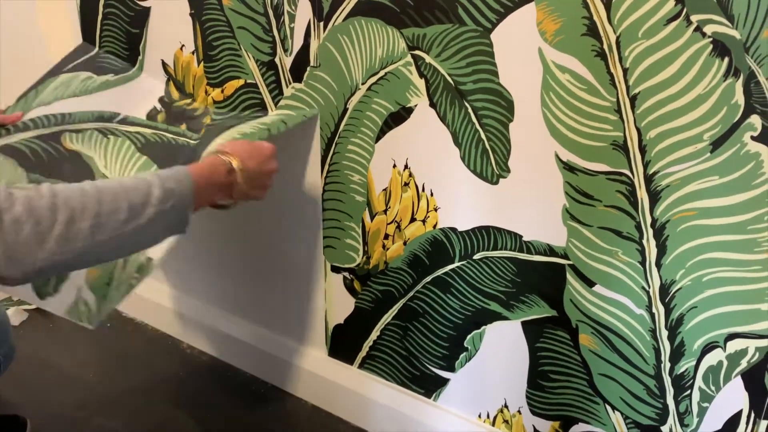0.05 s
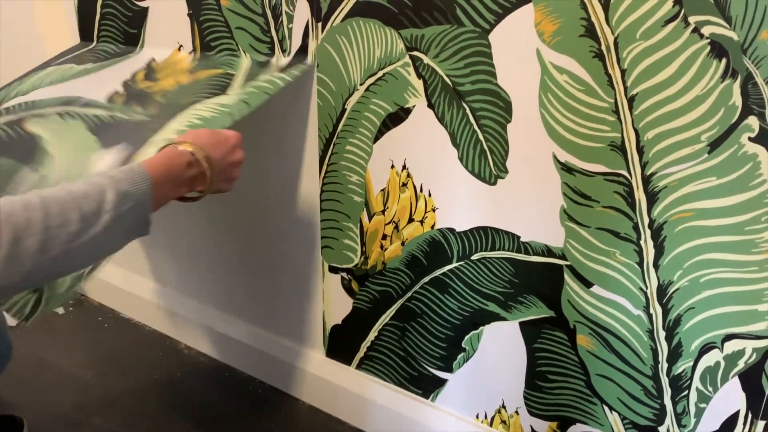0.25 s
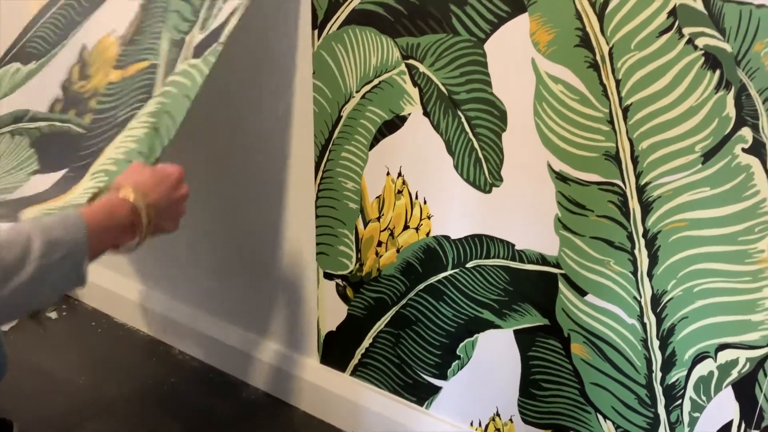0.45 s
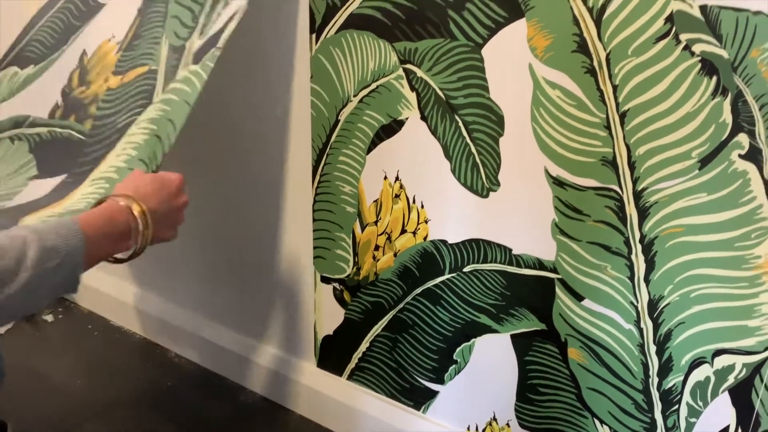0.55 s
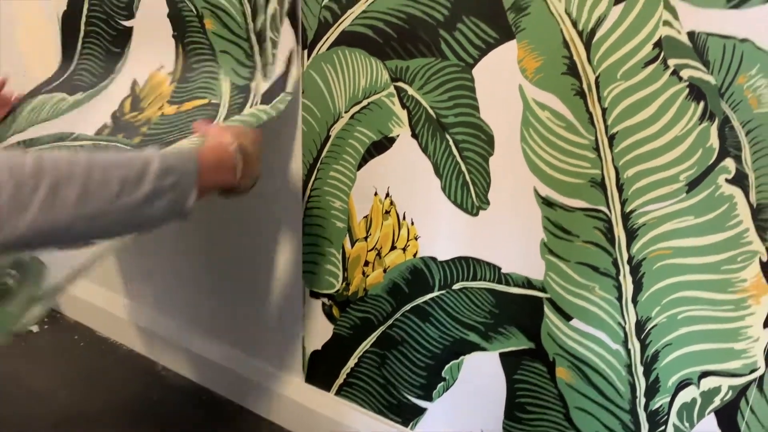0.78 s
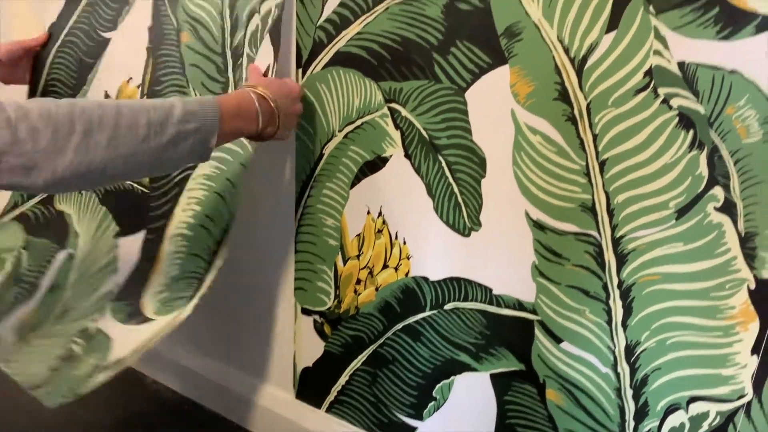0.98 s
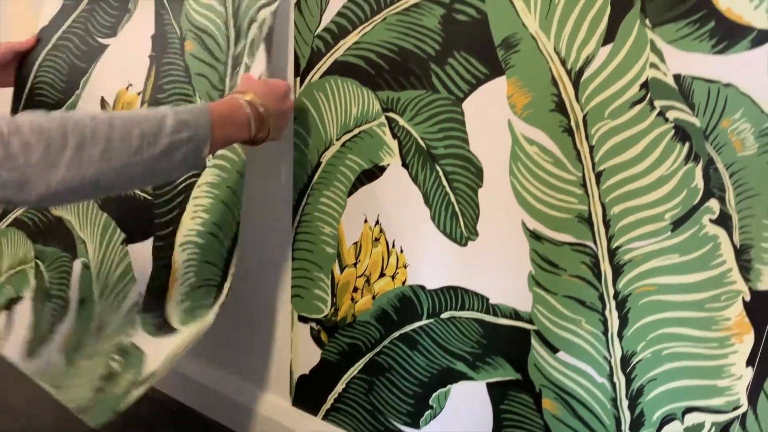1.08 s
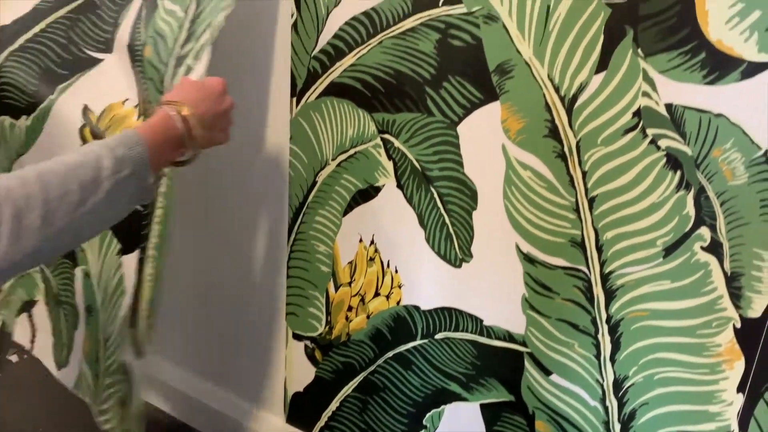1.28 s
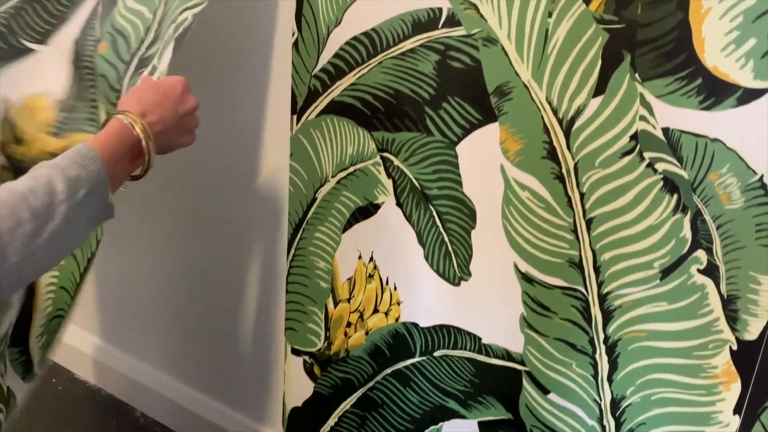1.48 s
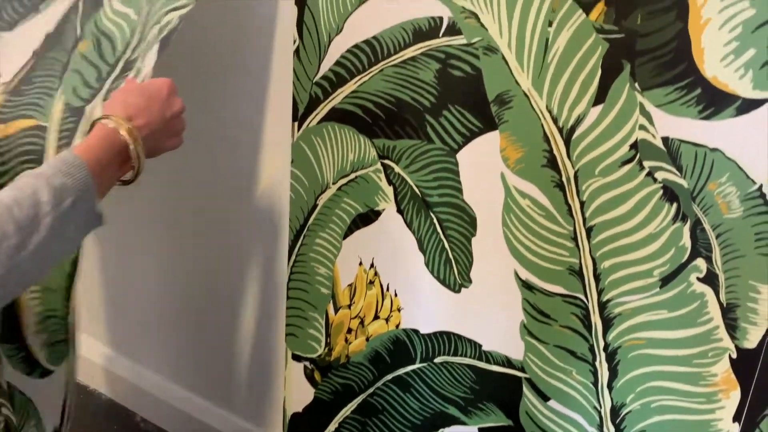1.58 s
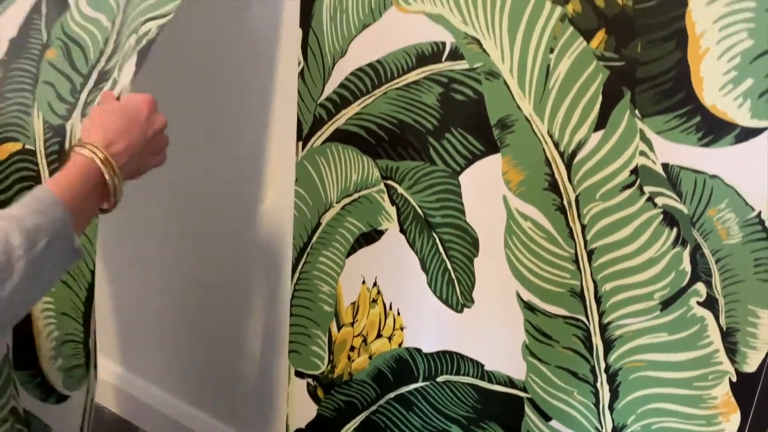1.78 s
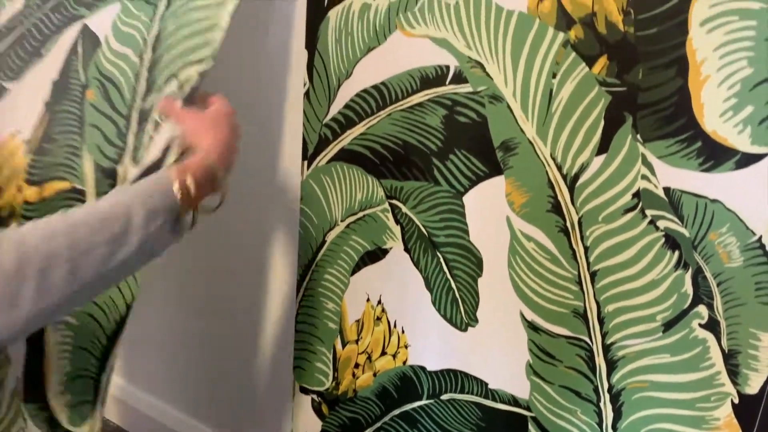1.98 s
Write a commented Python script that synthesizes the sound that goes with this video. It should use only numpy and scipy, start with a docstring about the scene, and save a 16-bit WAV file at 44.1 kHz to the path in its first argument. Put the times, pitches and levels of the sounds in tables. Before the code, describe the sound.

Wallpaper rips off a wall in two crackling pulls, with faint paper rustling between.

```python
"""A crackling rip swells as wallpaper is pulled off the wall of a bare room, heard on one microphone.
The paste lets go in thousands of tiny snaps that drum the loose sheet and ring the taut strip. Between
two strong pulls the sheet slides, flexes and crinkles as the hand takes a new grip; bangles tick faintly
on the wrist. The sheet buckles with dull pops and swings near enough to puff air at the microphone.
Near surfaces throw the treble back, and the room rings behind it."""
import sys
import numpy as np
from scipy import signal
from scipy.fft import rfft, irfft, next_fast_len
from scipy.io import wavfile
from scipy.ndimage import uniform_filter1d, map_coordinates

SR = 44100
rng = np.random.default_rng(int(sys.argv[2]) if len(sys.argv) > 2 else 0)


def master_out(mix):
    """Clip the mix to full scale and print it as 16-bit PCM to the path in sys.argv[1]."""
    frames = np.transpose(np.atleast_2d(mix))
    ceiling = np.clip(frames, -1, 1)
    pcm = np.round(ceiling * 32767).astype(np.int16)
    wavfile.write(sys.argv[1], SR, pcm)


N = 90404

# course of each pull: t/s, relative rip level/dB, relative sheet level/dB
FIRST_PULL = [(0, -47, -47.5), (.03, -47.5, -47), (.06, -42, -43.5), (.115, -44, -47.5), (.14, -40, -41),
              (.2, -40.5, -39), (.212, -33.5, -36), (.26, -35.5, -38.5), (.29, -34, -36), (.32, -36, -37),
              (.35, -30, -39.5), (.405, -21, -34), (.45, -21, -38.5), (.475, -27.5, -42.5), (.5, -35, -48),
              (.525, -56, -79), (.58, -78, -79)]
SECOND_PULL = [(1.085, -59, -70), (1.13, -47, -52), (1.15, -42, -53), (1.17, -32.5, -43),
               (1.22, -33, -41.5), (1.27, -34.5, -43.5), (1.34, -35, -42), (1.365, -30, -35.5),
               (1.405, -26.5, -35.5), (1.445, -28, -38), (1.49, -32, -41), (1.52, -28.5, -39.5),
               (1.565, -31, -34), (1.6, -23, -34.5), (1.62, -29.5, -38), (1.645, -24, -29),
               (1.68, -30, -37.5), (1.72, -30.5, -35.5), (1.755, -39.5, -44.5), (1.79, -51, -48),
               (1.85, -76.5, -53.5)]
# colours of the rip and of the drumming sheet in each pull: f/Hz, level/dB
FIRST_RIP_COLOUR = [(300, -22), (900, -9), (1550, -6), (2000, -6.5), (2500, -9.5), (3100, -6.5), (4200, -6),
                    (6500, -3.5), (9300, -1.5), (11000, -5), (13000, -12), (15500, -15)]
SECOND_RIP_COLOUR = [(300, -42.5), (900, -15), (1600, 2), (2300, -3.5), (3400, -1.5), (5200, -1.5),
                     (8700, 1), (11000, -2.5), (13000, -8), (15500, -11.5)]
FIRST_SHEET_COLOUR = [(30, -24), (75, -5.5), (140, -17), (175, -11.5), (215, -2), (290, -3), (370, -10),
                      (500, -1), (780, -2), (1150, -6), (2000, -11.5), (4000, -17), (12000, -37.5)]
SECOND_SHEET_COLOUR = [(30, -20), (75, -8), (140, -13), (175, -13), (215, -0.5), (290, -6.5), (370, -5.5),
                       (500, -0.5), (780, 1), (1150, -3.5), (2000, -16.5), (4000, -24.5), (12000, -46)]
# ring time of the room: f/Hz, t60/s
ROOM_T60 = [(100, 0.76), (500, 0.51), (2000, 0.68), (5000, .45), (9000, 0.22), (14000, 0.34)]
# colours of the room's ring and of its air: f/Hz, level/dB
ROOM_COLOUR = [(60, -3.5), (500, 1), (2000, -3.5), (5000, -5.5), (10000, 2.5), (15000, -17)]
AIR_COLOUR = [(25, 3), (45, -7.5), (62, 1), (110, -15), (500, -11.5), (1500, -20.5), (4000, -31),
              (10000, -28.5), (15000, -39)]
# pops of the buckling sheet: t/s, level/dB, t60/s, low f/Hz, top f/Hz
BUCKLES = [(.064, -38.5, 0.086, 600, 1090), (.829, -46, 0.012, 100, 520), (1.539, -26.5, 0.076, 573, 1110)]
# puffs of air at the microphone: t/s, level/dB, width/s
WAFTS = [(0.39, -51.5, 0.075), (0.545, -58.5, 0.035), (1.146, -60.5, 0.024)]
# rings of the taut strip: t/s, level/dB, width/s, f/Hz
STRIP_RINGS = [(0.415, -41, 0.032, 727), (1.217, -43.5, 0.038, 4000), (1.397, -44, 0.038, 1540),
               (1.551, -36, 0.022, 2880), (1.643, -35.5, 0.031, 3000)]
# course of the sheet's sliding and of its bending: t/s, level/dB
SLIDE_LEVELS = [(.5, -57), (.62, -55.5), (.72, -60), (.8, -56), (.9, -57), (.935, -64), (1.0, -80),
                (1.76, -46), (1.82, -58.5), (1.93, -62), (2.0, -74)]
FLEX_LEVELS = [(.945, -71), (.962, -52.5), (1.0, -50), (1.022, -52.5), (1.05, -71)]
# bangles touching: t/s, level/dB
BANGLE_TICKS = [(.728, -58), (1.909, -74), (1.938, -53.5), (1.987, -68), (2.044, -57.5)]
# modes of a bangle: f/Hz, level/dB, t60/s
BANGLE_MODES = [(9440, -4, .03), (11400, 2, 0.016), (12000, 0, 0.021), (12800, -6, .06),
                (14800, -13.5, .12), (15500, -11, .1)]
# creases giving way: t/s, level/dB, t60/s
CRINKLES = [(0.971, -55, .04), (0.983, -51, 0.023), (1.085, -46, 0.022), (1.1, -39, .04),
            (1.108, -38.5, 0.016)]
# colours of the handled sheet: f/Hz, level/dB
SLIDE_COLOUR = [(60, -18), (250, -7), (550, -4.5), (1200, -8.5), (3000, -14), (6000, -14), (10500, -15),
                (15000, -27)]
FLEX_COLOUR = [(60, -10), (150, -17), (270, 3), (360, -14), (490, 2), (680, -4.5), (900, -13), (1250, -11),
               (2000, -37), (6000, -34)]
CRINKLE_COLOUR = [(500, -22), (1500, -4), (4000, -6.5), (6300, 2.5), (10000, 0), (15000, -10)]

FULL_PULL_DB, SNAPS_PER_S, RATE_EXPONENT = -25, 9000, .4  # snap rate at full pull; growth with amplitude
CATCH_PER_S, CATCH_DB = 360, 1.53  # the paste holds and gives unevenly
RIP_DB, SHEET_DB, WALLS_DB, ROOM_DB, AIR_DB = -1, -1.5, -4, -6.5, -60.5


def amp(db):
    return 10 ** (np.asarray(db) / 20)


def unit_rms(x):
    return x / np.sqrt(np.mean(x ** 2) + 1e-20)


def along(points, hz):
    """Interpolate (f/Hz, value) points on a log frequency axis."""
    freqs, values = np.transpose(points)
    return np.interp(np.log(hz + 1), np.log(freqs + 1), values)


def levels(rows):
    """One gain per sample for each dB column; silent outside the rows."""
    times, *columns = np.transpose(rows)
    t = np.arange(N) / SR
    return [amp(np.interp(t, times, db, left=-120, right=-120)) for db in columns]


def wobble(rate):
    """A smooth random curve, rate knots a second."""
    return map_coordinates(rng.standard_normal(N // 8), [np.arange(N) * rate / SR], mode="wrap")


def coloured(x, points, size=4096):
    """x through a causal filter of unit energy, shaped by (f/Hz, level/dB) points."""
    cepstrum = irfft(np.log(amp(along(points, np.fft.rfftfreq(size, 1 / SR)))))
    cepstrum[1:size // 2] *= 2  # fold to minimum phase
    cepstrum[size // 2 + 1:] = 0
    response = irfft(np.exp(rfft(cepstrum)))
    return signal.fftconvolve(x, response / np.linalg.norm(response))[:N]


def snaps(per_s, scatter_db):
    """Random tiny impulses of uneven size, rms about 1."""
    chance = np.clip(per_s / SR, 1e-4, 1)
    sizes = amp(scatter_db * np.clip(rng.standard_normal(N), -2.5, 2.5))
    return unit_rms(sizes) * rng.choice([-1, 1], N) * (rng.random(N) < chance) / np.sqrt(chance)


def dying(start, t60):
    """An envelope that jumps up at start and falls 60 dB in t60."""
    t = np.arange(N) / SR - start
    return (t >= 0) * np.exp(-np.log(1000) * np.abs(t) / t60)


def swell(centre, width):
    """A bell-shaped rise and fall."""
    return np.exp(-.5 * ((np.arange(N) / SR - centre) / width) ** 2)


def pull(rows, rip_colour, sheet_colour):
    """A harder pull breaks the paste faster; every snap crackles and drums the loose sheet."""
    rip, sheet = levels(rows)
    rate = SNAPS_PER_S * (rip / amp(FULL_PULL_DB)) ** RATE_EXPONENT
    catching = unit_rms(amp(CATCH_DB * wobble(CATCH_PER_S)))
    breaks = snaps(rate, scatter_db=4.5) * catching
    crackle = amp(RIP_DB) * coloured(breaks * rip, rip_colour)
    drumming = amp(SHEET_DB) * coloured(breaks * sheet, sheet_colour)
    return crackle + drumming


def shifting_colour(x, patchy_db):
    """The colour shifts in patches as the sheet changes shape."""
    spectra = signal.stft(x, nperseg=512)[2]
    patches = uniform_filter1d(rng.standard_normal(spectra.shape), 14, axis=0)
    patches = uniform_filter1d(patches, 8, axis=1)
    return signal.istft(spectra * amp(patchy_db * unit_rms(patches)), nperseg=512)[1][:N]


def wall_echoes(x, count=14, above_hz=1230, spread_s=.012, drift_s=.0012):
    """Near surfaces throw treble back at the microphone; the delays drift as the peel line travels."""
    treble = signal.sosfilt(signal.butter(2, above_hz, "high", fs=SR, output="sos"), x)
    out = np.zeros(N)
    for k in range(count):
        delay = np.abs(spread_s * rng.uniform(.1, 1) + drift_s * wobble(4))
        out += (-1) ** k * map_coordinates(treble, [np.arange(N) - SR * delay])
    return out / np.sqrt(count)


def room_ring(x, places=9):
    """The bare room rings, a little differently from each place along the peel."""
    out = np.zeros(N)
    for place in range(places):
        hz, t, spectra = signal.stft(rng.standard_normal(SR * 3 // 4), SR, nperseg=256)
        decay = np.exp(-np.log(1000) * t / along(ROOM_T60, hz)[:, None])
        tail = signal.istft(spectra * decay, SR, nperseg=256)[1]
        tail = np.pad(tail / np.linalg.norm(tail), (SR // 200, 0))  # 5 ms behind the direct sound
        share = np.maximum(0, 1 - np.abs(np.linspace(0, places - 1, N) - place))
        out += signal.fftconvolve(x * np.sqrt(share), tail)[:N]
    size = next_fast_len(N + SR // 2)
    colour = amp(along(ROOM_COLOUR, np.fft.rfftfreq(size, 1 / SR)))
    return irfft(rfft(out, size) * colour, size)[:N]


def room_air():
    """Steady, low room tone behind everything."""
    return amp(AIR_DB) * coloured(rng.standard_normal(N), AIR_COLOUR)


def buckles():
    """The sheet buckles with dull pops: one push and a short flutter each."""
    out = np.zeros(N)
    for start, db, t60, low_hz, top_hz in BUCKLES:
        flutter = rng.standard_normal(N) * dying(start, t60)
        push = dying(start, t60=.0035)
        band = [(low_hz / 4, -19), (low_hz, 0), (top_hz, -1), (top_hz * 2, -16), (12000, -45)]
        out += amp(db) * coloured(push + flutter, band)
    return out


def wafts():
    """The swinging sheet pushes soft, low puffs of air at the microphone."""
    push = sum(amp(db) * swell(centre, width) for centre, db, width in WAFTS)
    rumble = [(25, -11), (80, -2), (160, -14), (600, -52), (4000, -86)]
    return coloured(push * rng.standard_normal(N), rumble)


def taut_strip(q=4.3):
    """Snaps ring the taut strip in one broad resonance, which differs from tug to tug."""
    out = np.zeros(N)
    for centre, db, width, hz in STRIP_RINGS:
        band = signal.butter(2, [hz * (1 - .5 / q), hz * (1 + .5 / q)], "band", fs=SR, output="sos")
        ring = unit_rms(signal.sosfilt(band, snaps(3000, scatter_db=3)))
        out += amp(db) * swell(centre, width) * ring
    return out


def slide():
    """The loose sheet slides along the wall with a fine-grained rustle."""
    return coloured(snaps(5000, scatter_db=5.5) * levels(SLIDE_LEVELS)[0], SLIDE_COLOUR)


def bangles():
    """Thin metal rings touch and ring briefly, damped by the wrist."""
    t = np.arange(N) / SR
    out = np.zeros(N)
    for start, tick_db in BANGLE_TICKS:
        for hz, mode_db, t60 in BANGLE_MODES:
            gain = amp(tick_db + mode_db + rng.normal(0, 1.5))
            out += gain * dying(start, t60) * np.sin(2 * np.pi * hz * (t - start))
    return out


def flex():
    """The sheet bends with a soft, low wobble."""
    return coloured(snaps(1300, scatter_db=5) * levels(FLEX_LEVELS)[0], FLEX_COLOUR)


def crinkles():
    """Small creases give way in short, bright bursts of snaps."""
    creases = sum(amp(db) * dying(start, t60) for start, db, t60 in CRINKLES)
    return coloured(snaps(6000, scatter_db=.5) * creases, CRINKLE_COLOUR)


def scene():
    """Two pulls and the handling around them reach the microphone directly and by way of the room."""
    peel = pull(FIRST_PULL, FIRST_RIP_COLOUR, FIRST_SHEET_COLOUR)
    peel += pull(SECOND_PULL, SECOND_RIP_COLOUR, SECOND_SHEET_COLOUR)
    direct = shifting_colour(peel, patchy_db=.82) + buckles() + taut_strip()
    direct += slide() + bangles() + flex() + crinkles()
    reflected = amp(WALLS_DB) * wall_echoes(direct) + amp(ROOM_DB) * room_ring(direct)
    return (direct + reflected + room_air() + wafts())[None]


def record(dry):
    """The microphone fades steeply to nothing at its band limit."""
    top_hz, edge_hz = 15850, 250
    size = next_fast_len(N + SR // 2)
    passband = np.clip((top_hz - np.fft.rfftfreq(size, 1 / SR)) / edge_hz, 0, 1)
    return irfft(rfft(dry, size) * np.sin(np.pi / 2 * passband) ** 2, size)[..., :N]


dry = scene()
out = record(dry)
master_out(out)
```